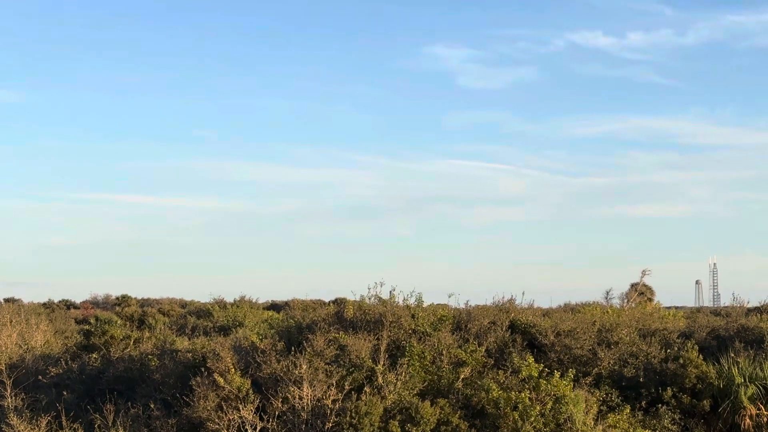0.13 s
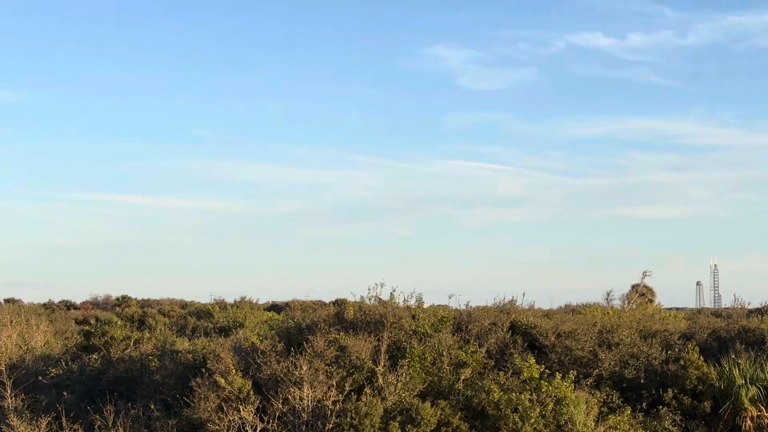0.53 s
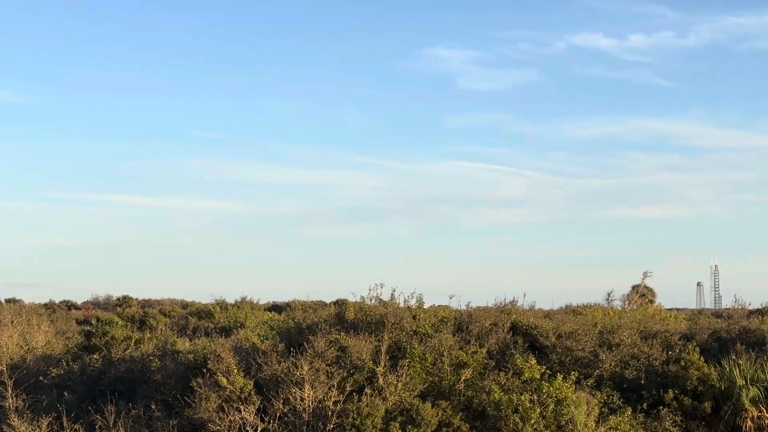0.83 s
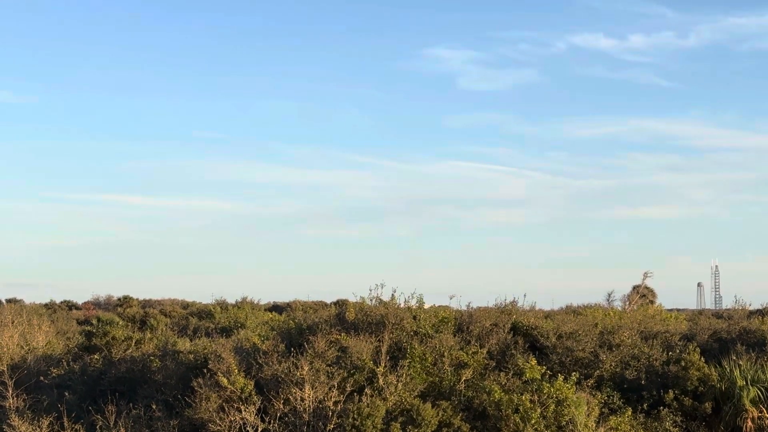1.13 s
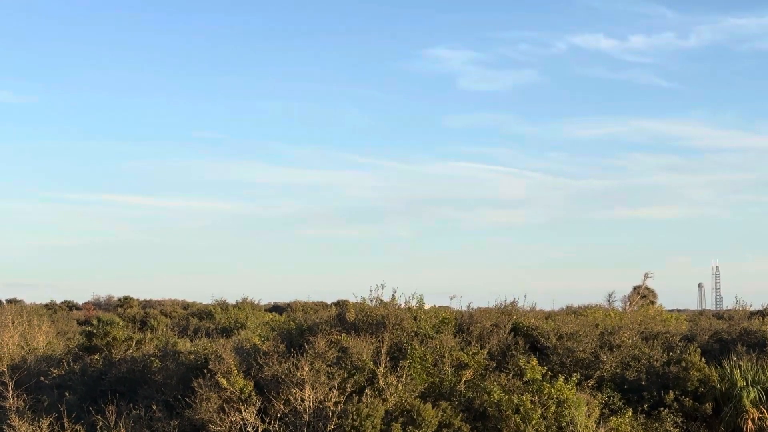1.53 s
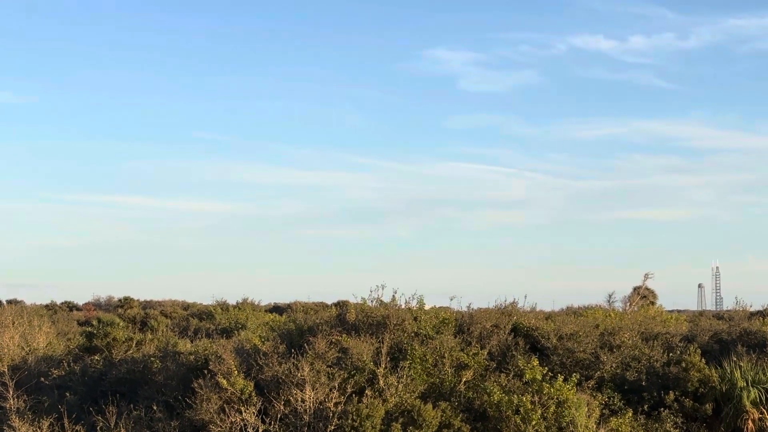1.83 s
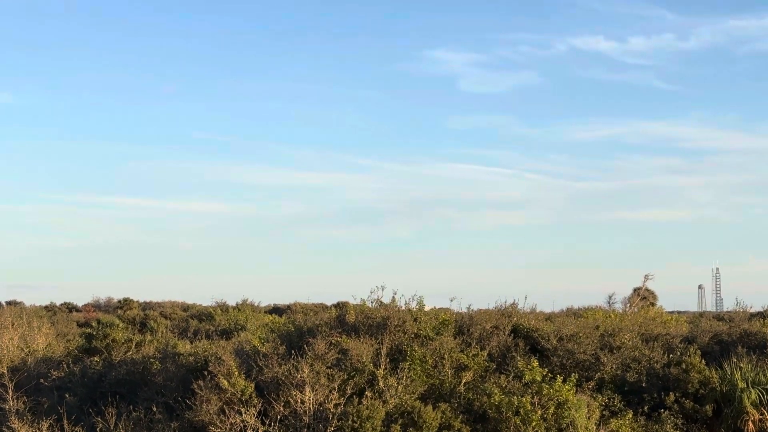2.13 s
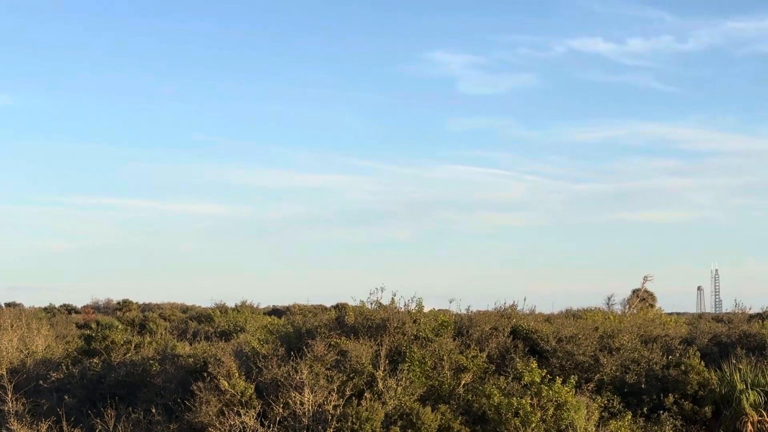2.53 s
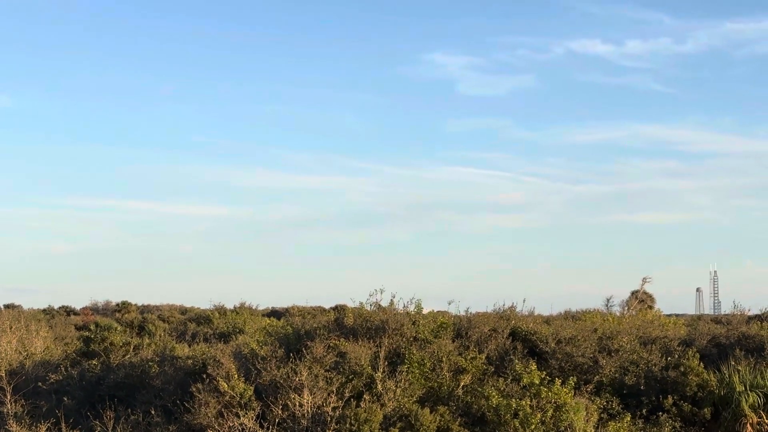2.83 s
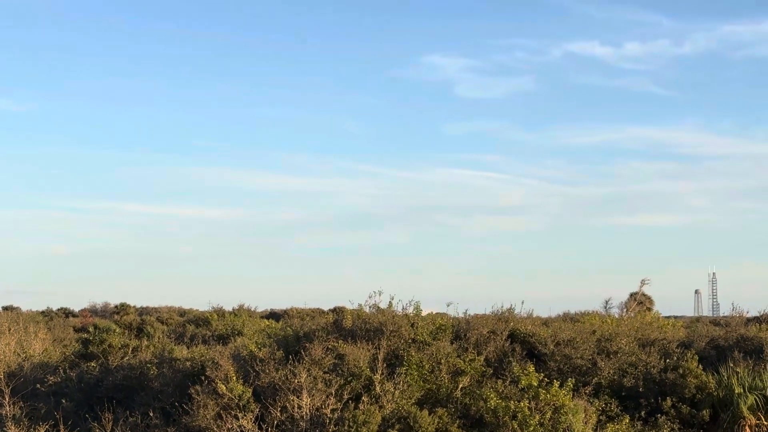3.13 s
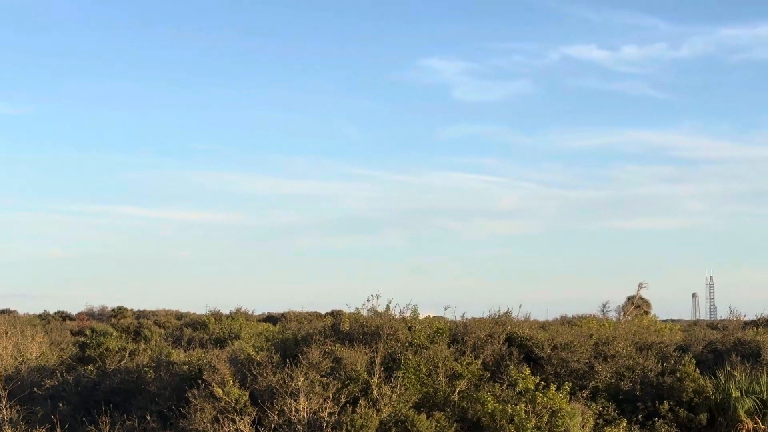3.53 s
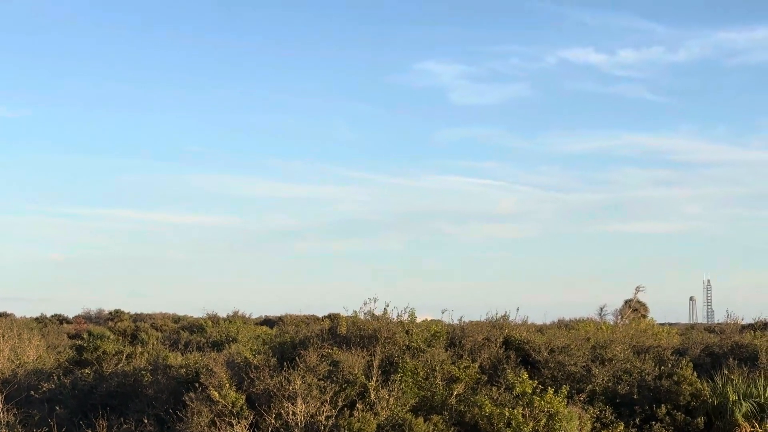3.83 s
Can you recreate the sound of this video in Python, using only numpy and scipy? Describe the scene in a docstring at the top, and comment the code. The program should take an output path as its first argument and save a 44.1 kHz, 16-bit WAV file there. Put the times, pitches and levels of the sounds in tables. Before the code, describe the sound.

A distant rocket landing across open scrub opens with a deep throbbing rumble and soft uneven crackle. From about 0.65 seconds it swells into a fluttering roar with dense, sharp, hollow-knocking cracks, loudest around 0.8 to 1.4 and briefly scattered by brush. They thin by 1.7, and after 2.2 a much quieter, dull rolling rumble remains, with faint crackle and airy hiss, fading toward 4.

```python
"""Rocket exhaust rumbles and roars as a rocket lands far away across open scrub: shaped noise with moving levels.
The sound steepens on the way into shock fronts, made as rounded pressure jumps that relax: a soft crackle
throughout, and a volley of sharp cracks as the roar swells at about one second. The brush scatters each front
into noise, and an inverted second arrival hollows the sound. A deep throb opens the scene; the roar sinks to a
dull rolling rumble with a faint hiss. A limiter holds the loudest peaks."""
import sys
import numpy as np
from scipy import signal
from scipy.fft import rfft, irfft
from scipy.io import wavfile
from scipy.ndimage import uniform_filter1d, minimum_filter1d

SR = 44100
rng = np.random.default_rng(int(sys.argv[2]) if len(sys.argv) > 2 else 0)


def generate_wav(sig):
    """Save sig (samples, or channels by samples) to the path in sys.argv[1] as 16-bit PCM at SR."""
    pcm = np.round(np.clip(np.atleast_2d(sig).T, -1, 1) * 32767).astype(np.int16)
    wavfile.write(sys.argv[1], SR, pcm)


N = 176400
TIME = np.arange(N) / SR


def from_db(db):
    """Level: decibels to amplitude gain."""
    return 10 ** (np.asarray(db) / 20)


def at_time(rows, s):
    """Linear interpolation: the columns of a curve at the given times."""
    times, *columns = np.transpose(rows)
    return [np.interp(s, times, column) for column in columns]


def bell(x, hz, q, db):
    """Resonance: a peaking filter raises or lowers one band."""
    w, g = 2 * np.pi * hz / SR, from_db(db / 2)
    k, c = np.sin(w) / (2 * q), -2 * np.cos(w)
    return signal.lfilter([1 + k * g, c, 1 - k * g], [1 + k / g, c, 1 - k / g], x)


def lag(x, hz, q):
    """Phase dispersion: an all-pass filter delays one band and keeps its level."""
    w = 2 * np.pi * hz / SR
    k = np.sin(w) / (2 * q)
    a = [1 + k, -2 * np.cos(w), 1 - k]
    return signal.lfilter(a[::-1], a, x)


def high_pass(x, hz):
    """Low-frequency attenuation: a second-order low cut."""
    return signal.sosfilt(signal.butter(2, hz, "high", fs=SR, output="sos"), x)


# stereo width of the noise: (pitch_hz, side_against_mid_db)
WIDTH = [(30, -33.5), (125, -19.5), (500, -21.5), (1000, -13), (2000, -10.5), (4000, -23.5), (10000, -2.5)]


def shaped_noise(spectrum):
    """Spectral shaping: stereo noise of rms 1, most alike in both channels at low pitch."""
    log_hz = np.log(np.arange(N // 2 + 1) * SR / N + 1)

    def gain_of(points):
        hz, db = np.transpose(points)
        return from_db(np.interp(log_hz, np.log(hz), db))

    width = gain_of(WIDTH)
    mid, side = rfft(rng.standard_normal((2, N))) * gain_of(spectrum)
    noise = irfft(np.array([mid + width * side, mid - width * side]), N)
    return noise / noise.std()


# exhaust noise over time: (start_s, rumble_db, low_roar_db, high_roar_db, treble_db)
EXHAUST = [(0, -15, -25, -28.5, -41.5), (0.101, -22.5, -21.5, -28.5, -38.5), (.2, -21, -24.5, -33, -42.5),
           (.29, -17.5, -26.5, -33.5, -44), (0.341, -22, -25.5, -31.5, -39.5),
           (0.449, -18.5, -25.5, -29, -41.5), (.58, -21.5, -25.5, -28.5, -43), (.7, -23.5, -22, -23, -40.5),
           (.85, -38, -17, -22, -42), (.94, -21.5, -19.5, -23.5, -37), (1.029, -21, -16.5, -26.5, -45),
           (1.28, -13.5, -24, -24, -40), (1.48, -24.5, -26, -25, -39), (1.7, -29, -25.5, -27.5, -44),
           (1.95, -27.5, -29.5, -32.5, -48), (2.25, -30, -35.5, -37.5, -49.5),
           (2.275, -25.5, -36.5, -31, -44), (2.33, -30, -32, -37, -47.5), (2.6, -31, -33.5, -37.5, -49),
           (3.1, -26.5, -34.5, -37.5, -48), (3.35, -28.5, -31.5, -37, -46.5),
           (3.6, -29.5, -35.5, -37.5, -50), (3.8, -33, -36.5, -38.5, -52), (4, -33, -37, -39, -57.5)]
# relative spectra of the four layers: (pitch_hz, level_db per Hz)
RUMBLE = [(20, -41.5), (31, -15.5), (40, -4), (50, 3.5), (70, 6), (100, 2.5), (150, -4.5), (200, -17.5),
          (300, -18.5), (600, -84.5), (2000, -120)]
LOW_ROAR = [(80, -20.5), (140, -0.5), (190, 2.5), (250, 0.5), (320, -1), (420, -4), (520, -10.5),
            (700, -29.5), (1500, -47.5), (4000, -73.5), (10000, -110)]
HIGH_ROAR = [(100, -36), (350, -18.5), (500, 3), (620, -3.5), (760, -1.5), (950, -10), (1250, -13.5),
             (1600, -24.5), (4000, -63), (10000, -105)]
TREBLE = [(300, -29.5), (1000, -4.5), (1250, 2.5), (1450, -3), (1700, 2), (2000, -4), (2600, -10),
          (3300, -18.5), (4200, -29), (6000, -51.5), (9200, -65), (9500, -39.5), (9850, -40.5),
          (10200, -66.5), (15000, -92)]
FLUTTER_HZ = (12, 60.4)   # range of flutter rates
FLUTTER_DB = (0, 1, 1.201, 2.001)   # rms depth for rumble, low roar, high roar, treble


def exhaust():
    """Jet mixing noise: four bands swell separately; turbulence makes roar and treble flutter together."""
    flutter_band = signal.butter(2, FLUTTER_HZ, "band", fs=SR, output="sos")
    flutter = signal.sosfilt(flutter_band, rng.standard_normal(N + SR))[SR:]
    flutter = flutter / flutter.std()
    out = 0
    spectra = (RUMBLE, LOW_ROAR, HIGH_ROAR, TREBLE)
    for level_db, depth_db, spectrum in zip(at_time(EXHAUST, TIME), FLUTTER_DB, spectra):
        out = out + from_db(level_db + depth_db * flutter) * shaped_noise(spectrum)
    return out


# lower limit on rise time, which blunts the late fronts: (start_s, shortest_rise_us)
BLUNTING = [(0, 10), (1.7, 10), (2.2, 112)]
FOLD_S, FOLD_SHARE = .0006, 0.2   # longest delay of the folded twin; its share of the front
RELAX_S, SHOCK_S = 0.0021, .03   # decay constant of the pressure; length of one shock


def shocks(rows):
    """Nonlinear steepening: a rounded pressure jump, folded by turbulence into a weaker twin, relaxes."""
    lead, length = SR // 500, int(SHOCK_S * SR)   # lead leaves room for the rise before the jump
    out = np.zeros(N + SR)
    for s, db, rise_us in rows:
        start = max(int(s * SR), 0)
        t = (start + np.arange(-lead, length)) / SR - s
        shortest_us, = at_time(BLUNTING, s)
        rise_s = max(rise_us, shortest_us) * 1e-6
        front = (1 + np.tanh(t / rise_s)) / 2
        twin = np.interp(t - FOLD_S * rng.random(), t, front)
        front = front + FOLD_SHARE * (twin - front)
        out[start:start + lead + length] += from_db(db) * front * np.exp(-t / RELAX_S)
    return out[lead:lead + N] + 1e-18   # the offset keeps later filters clear of exact silence


# individually timed shock fronts, strong and faint, before colouring: (start_s, jump_db, rise_us)
CRACKS = [(0.0233, -8.5, 59), (0.0626, -18, 65), (0.0708, -8.5, 53), (0.0834, -9.5, 58),
          (0.0901, -10.5, 68), (0.1029, -8.5, 69), (0.1172, -11.5, 86), (0.1384, -11, 86),
          (0.151, -11.5, 58), (0.165, -10.5, 88), (0.2077, -13, 95), (0.2225, -14, 98), (0.2469, -9, 90),
          (0.2607, -13, 75), (0.284, -10, 100), (0.3412, -13, 100), (0.3818, -11.5, 80),
          (0.4287, -9.5, 110), (0.4745, -15, 94), (0.5639, -12.5, 96), (0.6559, -6.5, 110),
          (0.7129, -6, 116), (0.7572, -3.5, 110), (0.7842, -2.5, 112), (0.8073, -7.5, 87),
          (0.8103, -6, 106), (0.8318, 0, 57), (0.8455, -5, 92), (0.852, -0.5, 70), (0.8615, -11.5, 110),
          (0.8682, 1, 64), (0.8807, 2, 74), (0.8918, -2, 87), (0.936, -2.5, 108), (0.9427, -6, 83),
          (0.9521, -1, 72), (0.9579, 4, 44), (0.966, -6.5, 82), (0.9731, -10.5, 71), (0.9929, 2.5, 48),
          (1.0034, -3, 56), (1.0145, 1, 54), (1.0294, 0.5, 26), (1.0407, -21.0, 24), (1.0517, -16.5, 54),
          (1.0604, 2.5, 74), (1.0729, -2.5, 110), (1.0772, -1.5, 48), (1.0859, -11, 68), (1.1025, 3, 74),
          (1.1087, -9.5, 64), (1.1124, -13, 82), (1.1187, -8, 60), (1.1351, -3, 55), (1.1404, -15, 43),
          (1.1526, -1.5, 69), (1.1657, -1, 32), (1.1772, -3, 120), (1.1873, -8.5, 58), (1.2007, -6, 28),
          (1.2191, -3.5, 59), (1.2221, -5, 63), (1.2299, -1, 56), (1.2407, -9, 40), (1.2645, -4.5, 63),
          (1.2827, -2.5, 39), (1.2929, -2.5, 72), (1.2976, -12.5, 37), (1.3213, -1, 100),
          (1.3323, -5.5, 48), (1.3434, -11.0, 60), (1.3546, -4, 83), (1.3849, 0.5, 48), (1.4026, -6, 45),
          (1.4234, -8, 59), (1.4432, -7.5, 66), (1.4627, -8, 76), (1.4766, -7, 76), (1.525, -10, 88),
          (1.56, -17.0, 56), (1.5714, -16.5, 74), (1.6091, -15, 60), (1.6239, -12, 71), (1.6751, -15, 94),
          (2.9985, -18, 47), (3.0757, -14.5, 96), (3.1635, -24, 66), (3.3576, -20.5, 47)]


def cracks():
    """Shock waves: individually timed fronts, strong and faint, most crowded around one second."""
    return shocks(CRACKS)


# the many small shocks, before colouring: (start_s, typical_jump_db, typical_rise_us, size_spread_db)
CRACKLE = [(0, -26.5, 210, 0.5), (.4, -22.5, 150, 5), (.53, -26, 170, -3), (.75, -21, 74, -3),
           (.87, -23, 160, 0), (.93, -23.5, 130, 6.5), (1.03, -15.5, 99, -0.5), (1.3, -19, 42, 1),
           (1.45, -15.5, 76, -4.5), (1.65, -21.5, 82, -7), (1.9, -28.5, 100, 3), (2.22, -34, 96, 4.5),
           (2.7, -30, 135, 0.5), (3.1, -26.5, 72, 0.5), (3.6, -32, 110, 4.5), (4, -40.5, 180, 4.5)]
SHOCKS_PER_S = 175
STEEPENING = .15   # dB of shortening in rise time per dB of extra size


def crackle():
    """Shock merging: small fronts are uneven but seldom close together; the bigger ones are steeper."""
    waits = rng.exponential(1, (2000, 4))
    s = np.cumsum(waits[:, 1:].mean(axis=1)) / SHOCKS_PER_S   # averaging makes short gaps rare
    db, rise_us, spread_db = at_time(CRACKLE, s)
    size_db = spread_db * (np.minimum(waits[:, 0], 3) - 1)
    rows = np.transpose([s, db + size_db, rise_us * from_db(-STEEPENING * size_db)])
    return shocks(rows[s < N / SR])


# colour that ground and microphone give to a front: (pitch_hz, q, level_db)
COLOUR = [(189, 2, 1.5), (1030, 2.4, 1), (1440, 11, -4), (1940, 7.7, -1.5), (6400, 2.5, -8.5),
          (8000, 1.7, 6), (9650, 15, -12), (12700, 10, -20)]
# bands delayed by all-pass filters: (pitch_hz, q)
LAGS = [(370, 1.12), (142, 1.19)]
# hollow knock, weak at first, strongest from 0.8 to 1.8 s, then about half: (start_s, share)
KNOCK = [(0, 0.17), (.45, 0.36), (.8, 1), (1.8, 0.98), (2.6, 0.43), (4, 0.42)]
KNOCK_HZ, KNOCK_Q, KNOCK_DB = 637, 1.47, 10
LOW_CUT_HZ = 54.4


def over_ground(x):
    """Ground filtering: fronts lose their deepest part, gain a hollow knock, and their lows arrive late."""
    for hz, q, db in COLOUR:
        x = bell(x, hz, q, db)
    share, = at_time(KNOCK, TIME)
    x = x + share * (bell(x, KNOCK_HZ, KNOCK_Q, KNOCK_DB) - x)
    for hz, q in LAGS:
        x = lag(x, hz, q)
    return high_pass(high_pass(x, LOW_CUT_HZ), LOW_CUT_HZ)


# a duller arrival by another path, strongest near 0.45 s and weakest near 0.8 s: (start_s, level_db)
ECHO = [(0, -10.5), (.45, -5.5), (.8, -28.5), (4, -15)]
ECHO_S, ECHO_CUT_HZ, ECHO_LOW_HZ = 0.003686, 3400, 125   # delay; upper and lower cut


def second_arrival(x):
    """Multipath interference: a thinner, duller, inverted copy a few milliseconds late hollows the sound."""
    db, = at_time(ECHO, TIME)
    thin = high_pass(x, ECHO_LOW_HZ)
    dull = signal.sosfilt(signal.butter(2, ECHO_CUT_HZ, fs=SR, output="sos"), thin)
    late = np.array([np.interp(TIME - ECHO_S, TIME, channel, left=0) for channel in dull])
    return -from_db(db) * late


# scatter by band: (lowest_hz, highest_hz, twigs_db, scrub_db)
SCATTER = [(400, 1700, -19.5, -17.5), (1200, 2800, -9, -21.5), (2700, 2760, -7, -3), (5200, 7900, -9, -6.5),
           (10000, 15000, -1, -17)]
# level of the fronts that feed the scatter: (start_s, level_db)
SPRAY = [(0, 4.5), (.8, 0.5), (1.05, 0.5), (1.15, 0.5), (1.45, 0), (1.8, 2.5), (4, 9)]
TWIGS_T60_S, SCRUB_T60_S = 0.011, 0.054   # time to decay by 60 dB: near twigs, wider scrub
SCATTER_SIDE_DB = -5   # side against mid


def scatter(fronts):
    """Diffuse scattering: twigs and scrub break fronts into decaying noise, different on each side."""
    spray_db, = at_time(SPRAY, TIME)
    x = from_db(spray_db) * fronts
    out = 0
    for low_hz, high_hz, twigs_db, scrub_db in SCATTER:
        sos = signal.butter(3, [low_hz, high_hz], "band", fs=SR, output="sos")
        band = signal.sosfilt(sos, x)
        power = 0
        for db, t60 in ((twigs_db, TWIGS_T60_S), (scrub_db, SCRUB_T60_S)):
            r = from_db(-60 / (t60 * SR)) ** 2   # power kept from one sample to the next
            power = power + from_db(db) ** 2 * signal.lfilter([1 - r], [1, -r], band ** 2)
        # the noise takes the smoothed spectrum of the band
        colour = np.sqrt(uniform_filter1d(np.abs(rfft(band)) ** 2, size=801).clip(0))
        noise = irfft(rfft(rng.standard_normal((2, N))) * colour, N)
        mid, side = noise / noise.std()
        stereo = mid + from_db(SCATTER_SIDE_DB) * side * np.array([[1], [-1]])
        out = out + np.sqrt(power) * stereo
    return out


# deep throb under the opening: (start_s, level_db)
THROB_LEVEL = [(0, -28), (.1, -22), (.2, -22), (.29, -15.5), (.34, -28), (.45, -26), (.7, -42), (4, -70)]
# its relative spectrum: (pitch_hz, level_db per Hz)
THROB = [(25, -30), (45, -9), (72, 0), (95, -8.5), (160, -35), (1000, -120)]


def throb():
    """Narrow-band noise: random beating in a low band makes a deep throb that fades after the opening."""
    db, = at_time(THROB_LEVEL, TIME)
    return from_db(db) * shaped_noise(THROB)


# airy hiss that sets in under the late rumble: (start_s, level_db)
HISS_LEVEL = [(0, -98), (2.25, -78), (2.275, -61), (2.33, -65.5), (2.65, -65.5), (2.8, -67.5), (3.15, -75),
              (3.6, -70.5), (4, -95)]
# its relative spectrum: (pitch_hz, level_db per Hz)
HISS = [(1500, -31), (3000, 1.5), (4500, -9), (6000, -20), (8500, -31.5), (14000, -44)]


def hiss():
    """High-band noise: a faint smooth hiss with a slowly moving level."""
    db, = at_time(HISS_LEVEL, TIME)
    return from_db(db) * shaped_noise(HISS)


def scene():
    """Superposition: exhaust and fronts by two paths, the scatter of the fronts, throb and hiss."""
    fronts = over_ground(cracks() + crackle())
    direct = exhaust() + fronts
    return direct + second_arrival(direct) + scatter(fronts) + throb() + hiss()


CEILING_DB, RELEASE_DB_PER_S = -.6, 262
CUTOFF_HZ = 15800   # stopband edge


def record(dry):
    """Dynamic limiting: a look-ahead gain holds the peaks, then a steep low-pass cuts the top."""
    peak_db = 20 * np.log10(np.abs(dry).max(axis=0) + 1e-9)
    over_db = np.maximum(peak_db - CEILING_DB, 0)
    release_db = RELEASE_DB_PER_S * TIME
    held_db = np.maximum.accumulate(over_db + release_db) - release_db
    gain_db = uniform_filter1d(minimum_filter1d(-held_db, size=131), size=131)   # windows of about 3 ms
    low_pass = signal.cheby2(12, 70, CUTOFF_HZ, fs=SR, output="sos")
    return signal.sosfilt(low_pass, dry * from_db(gain_db))


dry = scene()
out = record(dry)
generate_wav(out)
```